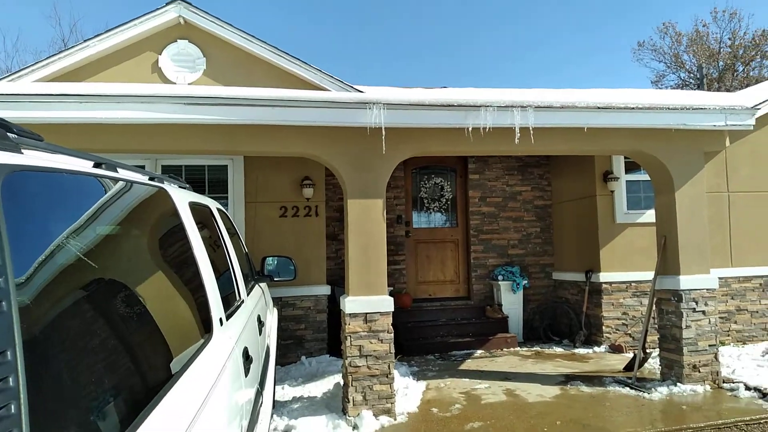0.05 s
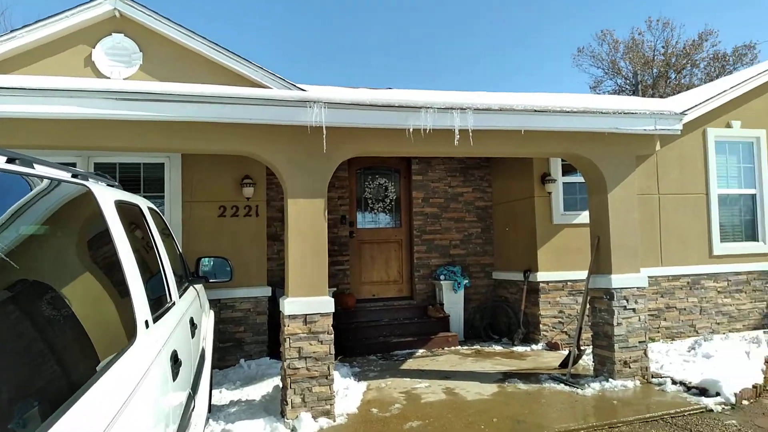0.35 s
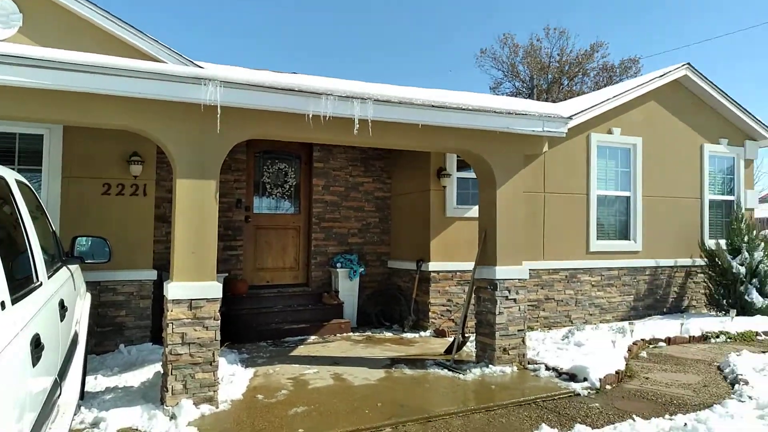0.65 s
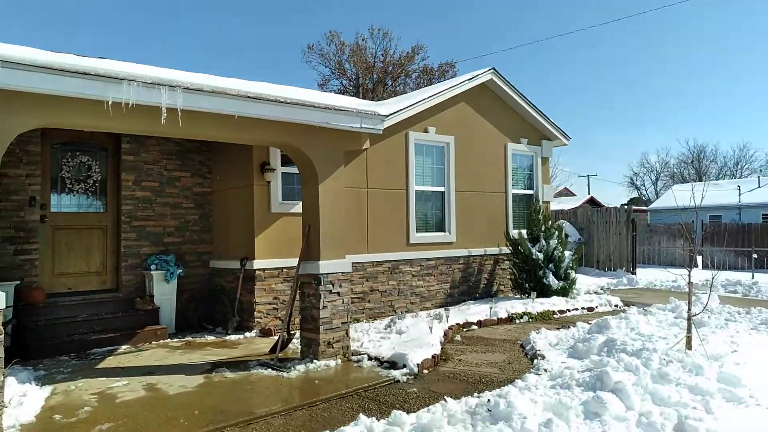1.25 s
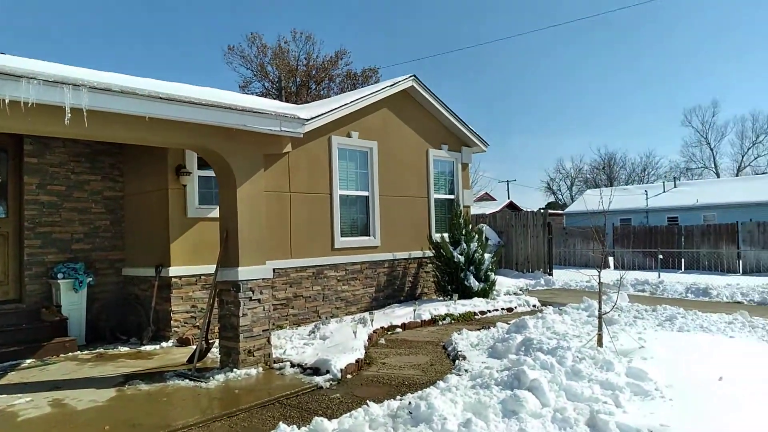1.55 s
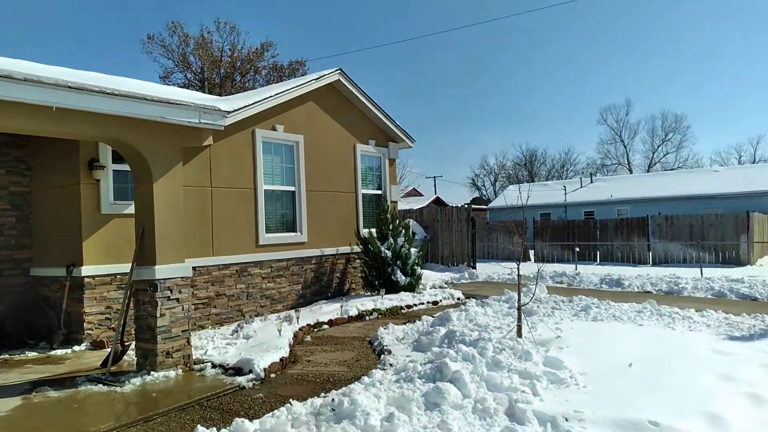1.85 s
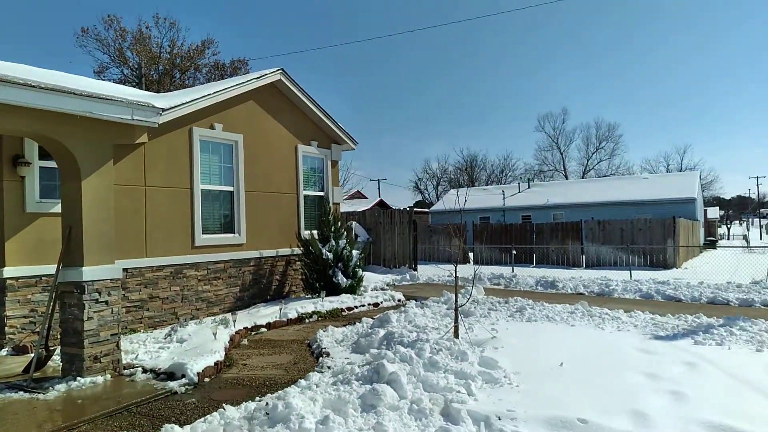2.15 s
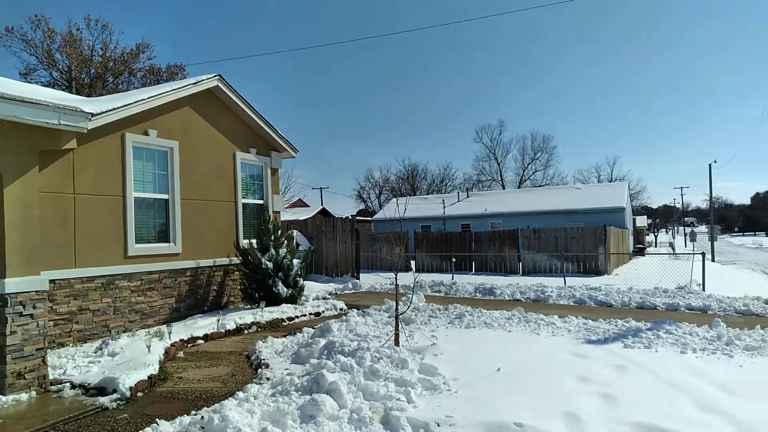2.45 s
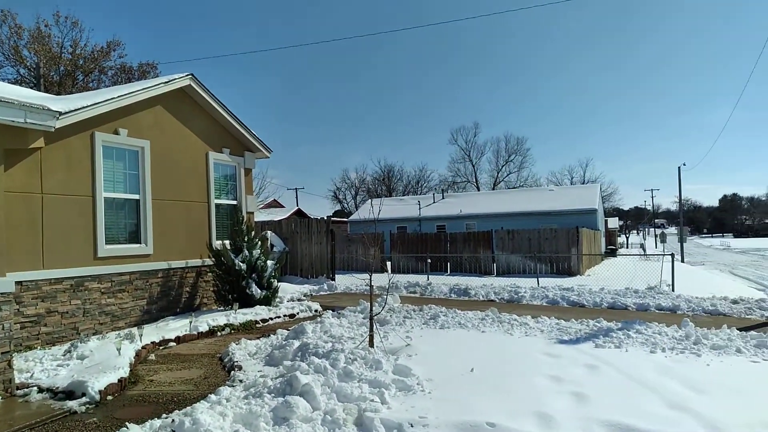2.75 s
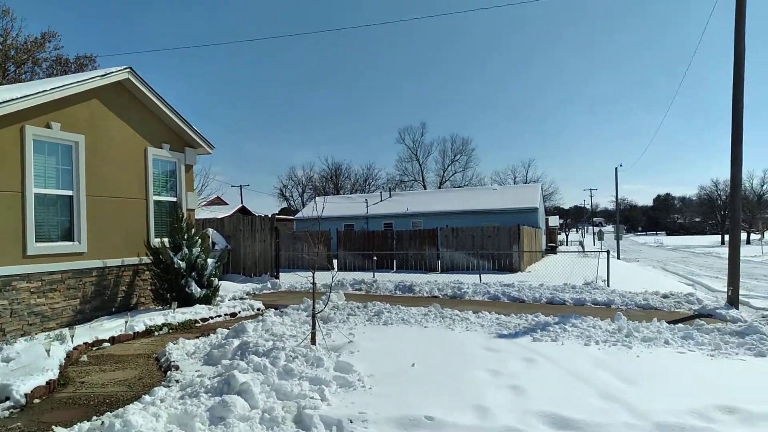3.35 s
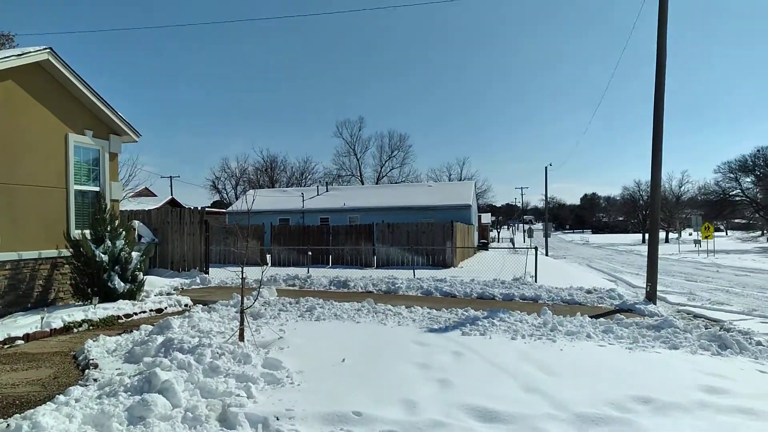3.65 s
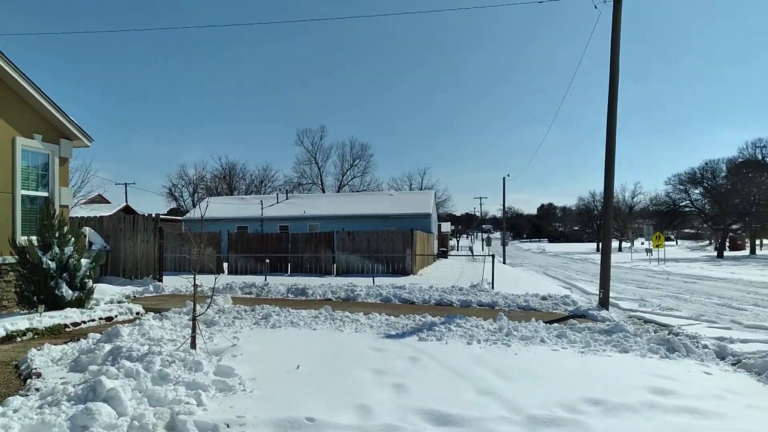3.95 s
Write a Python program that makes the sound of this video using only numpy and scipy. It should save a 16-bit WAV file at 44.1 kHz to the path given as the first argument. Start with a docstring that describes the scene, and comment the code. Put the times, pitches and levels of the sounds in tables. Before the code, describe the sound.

Wind buffets the microphone outside a snowy house, rumbling and thumping hard at first, then easing into lighter gusts. Meltwater drips from the eaves onto wet concrete in faint, high ticks over a quiet neighbourhood hush.

```python
"""Outside a snowy house, during a thaw. Gusts buffet the two microphone openings (ports), first hard
on the right, then lightly on both; the faster the air, the brighter its flutter. Meltwater drips
from the eaves onto wet concrete in sharp, high ticks, each with a little spray. Behind lie the faint
hush of the neighbourhood, a few soft hisses and two far tones; late on come small, dry clicks."""
import sys
import numpy as np
from scipy import signal
from scipy.fft import rfft, irfft
from scipy.io import wavfile
from scipy.ndimage import uniform_filter1d, map_coordinates

SR = 44100
rng = np.random.default_rng(int(sys.argv[2]) if len(sys.argv) > 2 else 0)


def dump(signal):
    """Clip the signal to [-1, 1] and save it as 16-bit WAV at the path in sys.argv[1]."""
    limited = np.clip(np.atleast_2d(signal).T, -1, 1)
    pcm = np.round(limited * 32767).astype(np.int16)
    wavfile.write(sys.argv[1], SR, pcm)


N = 176400
T = np.arange(N) / SR


def from_db(db):
    """Turn decibels (dB) into a number to multiply a sound by."""
    return 10 ** (np.asarray(db) / 20)


def unit_level(x):
    """Scale a signal so that its average level (rms) is 1."""
    return x / np.sqrt(np.mean(x ** 2) + 1e-20)


def panned(db):
    """Left and right gains, with the left louder by db."""
    gains = from_db([[db / 2], [-db / 2]])
    return gains / gains.mean()


def noise(colour, size=N):
    """Noise at level 1, coloured by rows of frequency in Hz and strength in dB."""
    hz, db = np.transpose(colour)
    bins = np.maximum(np.fft.rfftfreq(size, 1 / SR), 1)
    gains = from_db(np.interp(np.log(bins), np.log(hz), db))
    return unit_level(irfft(rfft(rng.standard_normal(size)) * gains, size))


def drift(rate_hz):
    """A smooth random wobble at level 1; a higher rate wobbles faster."""
    bins = np.fft.rfftfreq(N, 1 / SR)
    return unit_level(irfft(rfft(rng.standard_normal(N)) * np.exp(-(bins / rate_hz) ** 2), N))


def evened(x, span_s):
    """Hold the level steady over stretches longer than span_s."""
    size = max(int(span_s * SR), 8)
    return x / np.sqrt(uniform_filter1d(uniform_filter1d(x ** 2, size), size) + 1e-9)


def resonance(x, hz, width_hz):
    """Make a sound ring around one pitch; a narrower width rings longer."""
    r = np.exp(-np.pi * width_hz / SR)
    feedback = [1, -2 * r * np.cos(2 * np.pi * hz / SR), r * r]
    return signal.lfilter((1 - r * r) / 2 * np.array([1, 0, -1]), feedback, x + 1e-18)


def filtered(x, keep, hz, order):
    """Keep the "low" or "high" side of hz; a higher order cuts more steeply."""
    return signal.sosfilt(signal.butter(order, hz, keep, fs=SR, output="sos"), x + 1e-18)


# The gusts at each port. Each row: time in seconds, rumble in dB (played 3 dB lower), flutter in dB.
LEFT_GUSTS = [(0.0, -62, -60.5), (0.06, -19.5, -52), (0.09, -30.5, -55.5), (0.12, -24, -51),
              (0.23, -28, -40.5), (0.27, -20, -20.5), (0.31, -42, -47), (0.33, -19, -32.5),
              (0.4, -30.5, -61), (0.47, -20, -30), (0.52, -31.5, -63.5), (0.58, -22.5, -35.5),
              (0.61, -40, -52), (0.65, -13.5, -21), (0.68, -32.5, -46), (0.75, -26.5, -38.5),
              (0.85, -25, -45), (0.87, -20.5, -28.5), (0.95, -37.5, -50.5), (0.98, -28.5, -28.5),
              (1.06, -40, -61.5), (1.19, -43, -48.5), (1.22, -39, -52.5), (1.45, -46, -78.5),
              (1.48, -36.5, -45), (1.53, -52.5, -72), (1.72, -32.5, -40), (1.79, -52.5, -77),
              (1.88, -26.5, -48), (1.98, -42.5, -59.5), (2.05, -33.5, -70), (2.14, -51, -69.5),
              (2.5, -42.5, -70.5), (2.58, -37.5, -61.5), (2.63, -23, -39.5), (2.68, -43.5, -35.5),
              (2.77, -52, -58), (2.82, -28.5, -38), (2.86, -45, -85.5), (2.92, -49.5, -37),
              (2.97, -27.5, -56.5), (3.03, -30.5, -35), (3.1, -33.5, -40), (3.14, -17, -25.5),
              (3.24, -49.5, -52), (3.3, -38.5, -39.5), (3.38, -40, -70), (3.42, -43, -33), (3.45, -44, -70),
              (3.6, -35, -41), (3.68, -44, -66), (3.7, -26.5, -33.5), (3.77, -53.5, -55), (3.82, -50, -92),
              (4.0, -41, -48.5)]
RIGHT_GUSTS = [(0.0, -58, -24.5), (0.02, -33, -30), (0.05, -12, -22.5), (0.08, -33.5, -31),
               (0.13, -11, -21), (0.21, -42.5, -42.5), (0.23, -30, -26), (0.26, -20.5, -21),
               (0.32, -13, -23), (0.37, -44, -49), (0.41, -20, -22), (0.43, -42, -27), (0.49, -22.5, -23),
               (0.56, -32.5, -32.5), (0.62, -18, -18.5), (0.68, -7.5, -18), (0.75, -10, -14.5),
               (0.8, -24, -15), (0.83, -10, -23.5), (0.85, -25.5, -22), (0.89, -37, -20),
               (0.93, -22, -26.5), (0.98, -20, -19), (1.07, -9, -24), (1.09, -5.5, -20), (1.15, -17.5, -29),
               (1.17, -35, -33), (1.19, -26, -27.5), (1.25, -35.5, -36.5), (1.3, -24.5, -29.5),
               (1.34, -34, -32.5), (1.36, -43.5, -54.5), (1.48, -43.5, -72), (1.54, -37, -35.5),
               (1.59, -44.5, -58), (1.71, -39.5, -64), (1.74, -40.5, -44.5), (1.79, -46, -71.5),
               (1.98, -36.5, -54.5), (2.04, -29.5, -18), (2.07, -46.5, -44.5), (2.09, -13.5, -24.5),
               (2.11, -53, -47), (2.13, -17, -26.5), (2.23, -53, -32), (2.25, -52, -63),
               (2.3, -26.5, -40.5), (2.32, -40, -48), (2.35, -44, -31), (2.4, -51, -34),
               (2.44, -43.5, -52.5), (2.51, -49, -76), (2.55, -33.5, -62), (2.58, -37.5, -39),
               (2.63, -36, -57), (2.66, -43.5, -51), (2.81, -40, -64.5), (3.08, -38.5, -61),
               (3.1, -30.5, -30.5), (3.18, -53, -68), (3.56, -48, -72.5), (3.6, -28.5, -62),
               (3.69, -58.5, -83), (3.82, -56.5, -77), (3.86, -24, -70), (3.9, -39, -78), (3.96, -31, -60),
               (4.0, -47, -74)]
# The wind's deep, middle and fine parts. Each row: frequency in Hz, strength in dB.
RUMBLE_COLOUR = [(15, -36.5), (30, -14), (55, 3), (85, -0.5), (140, -2.5), (220, -11), (330, -19.5),
                 (600, -58), (1200, -110)]
FLUTTER_COLOUR = [(55, -18.5), (140, -10), (240, -1), (380, -4), (540, -14.5), (790, -26.5), (1250, -45),
                  (2000, -73.5), (6000, -130)]
CHURN_COLOUR = [(500, -7.5), (1300, 3), (2100, -15.5), (3000, -22.5), (5000, -43.5)]

def wind(gusts, strong_db=-24):
    """Swirling air rumbles past one port; faster air flutters louder and higher, and churns more."""
    times, *columns = np.transpose(gusts)
    levels = np.array([np.interp(T, times, column) for column in columns])
    rumble_db, flutter_db = uniform_filter1d(levels, size=200)
    surge_db = 6 * drift(54.94)
    excess_db = flutter_db - strong_db
    speed = from_db(.16 * np.maximum(excess_db, 0))
    # Reading through the noise faster raises its pitch.
    swirl = map_coordinates(noise(FLUTTER_COLOUR), [np.cumsum(speed) % (N - 1)], order=3, mode="wrap")
    flutter = from_db(flutter_db) * evened(swirl * from_db(surge_db), span_s=.03)
    churn = from_db(-69 + 2.98 * excess_db + surge_db) * noise(CHURN_COLOUR)
    rumble = from_db(rumble_db - 3) * evened(noise(RUMBLE_COLOUR), span_s=.035)
    return flutter + churn + rumble


# The distant background. Each row: frequency in Hz, strength in dB.
HUSH_COLOUR = [(30, 15), (300, 13.5), (700, 4.5), (1100, -3), (1700, 0.5), (3000, -10.5), (4600, -10.5),
               (6500, -9), (8800, -4.5), (11000, -13), (16000, -16.5)]

def hush(level_db=-71):
    """The neighbourhood makes a faint, steady noise, different on each side."""
    return from_db(level_db) * np.array([noise(HUSH_COLOUR), noise(HUSH_COLOUR)])


TICK_S = .00098  # how quickly a drop's tick dies away

def drip_colour(x, splat_db):
    """A drip's tick: a thin, high ring near 9 kHz, a weak body and a bright splat."""
    ring_hz = 9020 * (1 + .028 * rng.standard_normal())
    ring = resonance(resonance(x, ring_hz, width_hz=1700), ring_hz, width_hz=1700)
    body = from_db(-28.5) * resonance(x, hz=5526, width_hz=3700)
    splat = from_db(splat_db) * filtered(x, "high", hz=8500, order=4)
    return 2 * ring + body + splat


def small_drips(per_second=60):
    """Tiny drops tick faintly at random along the eaves, about half on each side."""
    lands = rng.random((2, N)) < per_second / 2 / SR
    hits = lands * from_db(-66 + 3 * rng.standard_normal((2, N)))
    fades = signal.lfilter([1], [1, -np.exp(-1 / (TICK_S * SR))], hits + 1e-18)
    return drip_colour(fades * rng.standard_normal((2, N)), splat_db=-13.5)


# Single whirls of air (eddies) slapping the right port. Each row: time in seconds,
# strength in dB before filtering, seconds from push to suck, treble limit in Hz.
EDDY_SLAPS = [(0.26, -4.5, 0.0032, 3500), (0.2833, 4, .0024, 7500), (0.485, -14, 0.0015, 1700),
              (0.6448, -8, 0.0024, 3000), (0.6907, -4.5, 0.0029, 5000), (0.71, -6, 0.00037, 2300),
              (0.73, -3.5, 0.00083, 1900), (.742, -7, 0.00063, 3500), (0.757, -5, 0.0014, 2600),
              (0.7683, -11.5, .0012, 6000), (0.779, -9.5, .0008, 2600), (0.8043, 0.5, 0.0015, 1400),
              (0.888, -12, 0.00078, 2400), (0.975, -12.5, .0014, 2400), (1.0828, -11, 0.0029, 4000),
              (1.094, -0.5, 0.0035, 6000), (1.1065, -8.5, 0.0023, 3500), (1.2211, -16.5, 0.00077, 1300),
              (2.0432, -18, .0011, 3300), (2.088, -16, 0.00088, 1100), (2.125, -19, 0.0013, 1500),
              (2.1605, -10, 0.0027, 900), (2.2058, -14.5, 0.00066, 1300), (2.2189, -10, 0.0013, 1000),
              (2.349, -26, 0.00056, 1100), (2.566, -27, 0.00074, 1000)]
# The short tail of noise after each slap. Each row: frequency in Hz, strength in dB.
TAIL_COLOUR = [(200, -20.5), (700, 5.5), (1800, -0.5), (3500, -13), (8000, -39)]

def eddies(tail_db=-17, tail_decay_s=.012):
    """Each eddy pushes, then sucks, making a dull thump or a crack; a dying tail of noise follows."""
    slaps, lead = np.zeros(N + SR), SR // 40
    t = T[:SR // 10] - T[lead]
    for time_s, db, length_s, top_hz in EDDY_SLAPS:
        push = np.exp(-2 * np.abs(t / length_s))
        suck = np.exp(-2 * np.abs(t / length_s - 1))
        start = int(time_s * SR) - lead
        slaps[start:start + len(t)] += from_db(db) * filtered(push - suck, "low", top_hz, order=6)
    tail = noise(TAIL_COLOUR, size=SR // 5) * np.exp(-T[:SR // 5] / tail_decay_s)
    tails = signal.fftconvolve(slaps, tail / np.linalg.norm(tail))[:N]
    return slaps[:N] + from_db(tail_db) * tails


def bump(t, half_s):
    """A smooth rise and fall that peaks where t is 0."""
    return np.exp(-(t / half_s) ** 2)


def droplets(t, count=5, longest_flight_s=.036):
    """The loudness over time of thrown droplets: they land unevenly, the late ones weaker."""
    lands_s = longest_flight_s * rng.uniform(.08, 1, (count, 1))
    sizes = from_db(3.5 + 1.5 * rng.standard_normal((count, 1))) * np.exp(-lands_s / longest_flight_s)
    return np.sum(sizes * bump(t - lands_s, TICK_S), axis=0)


# Drops falling from the eaves. Each row: time in seconds, tick level in dB, spray level in dB,
# left over right in dB, amount of bright splat in dB.
EAVES_DROPS = [(.3674, -51.5, -66.5, 6, -12.5), (0.645, -34, -48, -1.5, -12), (0.6447, -40, -56, -5, -3),
               (0.6657, -38, -56, 1, -9), (.671, -41.5, -54.5, -1, -5.5), (0.9317, -51, -64, 0, -7.5),
               (1.0985, -43.5, -61.5, 2.5, 28), (1.491, -59, -67.5, 15, -10), (1.5018, -52, -74, 5, 3),
               (1.531, -51, -66.5, 10, -8), (1.679, -62, -88, -22, 3), (1.863, -52.5, -65, -8.5, -14),
               (1.8885, -55.5, -69, -7, -15), (2.0833, -61.5, -70, -13, -12), (2.2, -62, -80, -13, -7),
               (2.44, -65.5, -76, -21, -7), (2.592, -56, -71, -10, 1), (2.669, -35.5, -52.5, -10, -28),
               (2.7642, -53, -74, -11, -3), (3.16, -58.5, -81, -8, -1), (3.2403, -62, -84, -1.5, -2),
               (3.3045, -45, -62, -6.5, -11.5), (3.466, -62, -66, -19, -6.5)]

def drips(rebound_db=-5.5, spray_rise_s=.002, spray_decay_s=.03):
    """A drop ticks as it hits and again as its crater closes; spray and droplets patter down after."""
    out, lead = np.zeros((2, N + SR)), SR // 200
    t = T[:SR // 4] - T[lead]
    since_hit = np.maximum(t, 0)
    mist = (1 - np.exp(-since_hit / spray_rise_s)) * np.exp(-since_hit / spray_decay_s)
    for time_s, tick_db, spray_db, pan_db, splat_db in EAVES_DROPS:
        rebound_s = .0022 * (.5 + rng.random())
        taps = bump(t, TICK_S) + from_db(rebound_db) * bump(t - rebound_s, TICK_S)
        water = unit_level(drip_colour(rng.standard_normal((2, len(t))), splat_db))
        tick = from_db(tick_db) * taps * evened(water, TICK_S)
        spray = from_db(spray_db) * (mist + droplets(t)) * water
        start = int(time_s * SR) - lead
        out[:, start:start + len(t)] += panned(pan_db) * (tick + spray)
    return out[:, :N]


# Soft hisses. Each row: start in seconds, length in seconds, hiss level in dB,
# left over right in dB, rustle level in dB before the fade-in.
SOFT_HISSES = [(0.541, 0.21, -69.5, 19.5, -100), (0.827, 0.17, -71.5, 15, -87.5),
               (2.888, 0.07, -69, 17, -92), (3.552, 0.2, -67.5, 5, -65), (3.907, 0.11, -67.5, 18, -76.5)]
# The high hiss and the lower rustle inside it. Each row: frequency in Hz, strength in dB.
HISS_COLOUR = [(2000, -33), (5000, -19.5), (7300, -14.5), (8400, 0), (9300, -4), (10500, -18.5),
               (12500, -22.5), (16000, -30.5)]
RUSTLE_COLOUR = [(900, -26), (1600, -0.5), (2500, 7), (3500, -7), (6500, -15), (10000, -29.5),
                 (16000, -46.5)]

def hisses(fade_s=.05, rustle_peak_s=.012, rustle_decay_s=.028, flicker_db=2.5):
    """Short, grainy hisses swell and fade; a lower rustle in them dies sooner."""
    hiss = np.array([noise(HISS_COLOUR), noise(HISS_COLOUR)])
    rustle = np.array([noise(RUSTLE_COLOUR), noise(RUSTLE_COLOUR)])
    out = np.zeros((2, N))
    for start_s, length_s, hiss_db, pan_db, rustle_db in SOFT_HISSES:
        t = T - start_s
        swell = np.clip(np.minimum(t, length_s - t) / fade_s + .5, 0, 1)
        rustle_gain = from_db(rustle_db) * np.exp(-np.abs(t - rustle_peak_s) / rustle_decay_s)
        out += panned(pan_db) * swell * (from_db(hiss_db) * hiss + rustle_gain * rustle)
    return out * from_db(flicker_db * drift(60))


# Far-off tones. Each row: middle in seconds, half the length in seconds, pitch in Hz, level in dB.
DISTANT_TONES = [(1.338, 0.051, 1492, -71.5), (3.802, 0.082, 735, -75)]

def far_tones(width_hz=50):
    """Faint, wavering tones come and go in the distance."""
    out = np.zeros((2, N))
    for middle_s, half_s, hz, db in DISTANT_TONES:
        band = resonance(rng.standard_normal((2, N)), hz, width_hz)
        tone = unit_level(resonance(band, hz, width_hz))
        out += from_db(db) * bump(T - middle_s, half_s) * tone
    return out


# Clicks close to the left port. Each row: time in seconds, level in dB, pitch in Hz.
NEAR_CLICKS = [(2.855, -66, 2800), (2.8982, -54, 6100), (3.013, -60.5, 6700), (3.9231, -51, 6250)]

def dry_clicks(half_s=.0011, width_hz=7000, pan_db=23.5):
    """Small, dry clicks sound lower than the drips and have no spray."""
    out = np.zeros(N)
    for time_s, db, hz in NEAR_CLICKS:
        band = resonance(rng.standard_normal(N), hz, width_hz)
        snap = unit_level(resonance(band, hz, 2 * width_hz))
        out += from_db(db) * bump(T - time_s, half_s) * snap
    return panned(pan_db) * out


def scene():
    """Add up all the sounds. The left port is sheltered, so its wind is duller."""
    left = filtered(wind(LEFT_GUSTS), "low", hz=630, order=4)
    right = wind(RIGHT_GUSTS) + eddies()
    buffeting = filtered(np.array([left, right]), "high", hz=52, order=2)
    return buffeting + hush() + small_drips() + drips() + hisses() + far_tones() + dry_clicks()


def record(dry, top_hz=15900):
    """Round off the tallest peaks and cut away the highest treble."""
    rounded = dry / (1 + dry ** 8) ** .125
    return signal.sosfilt(signal.ellip(10, .1, 80, top_hz, fs=SR, output="sos"), rounded)


dry = scene()
out = record(dry)
dump(out)
```